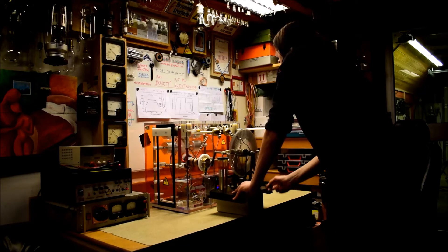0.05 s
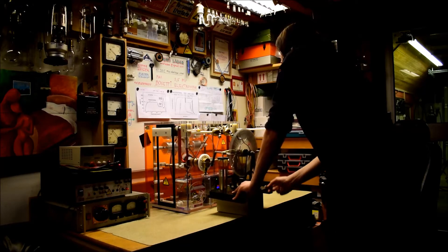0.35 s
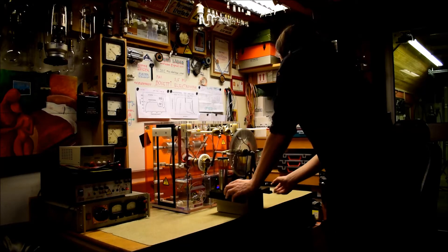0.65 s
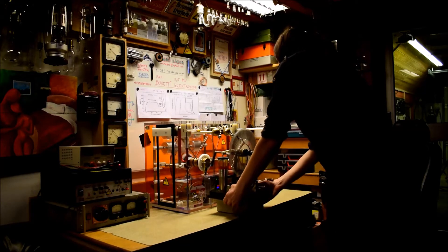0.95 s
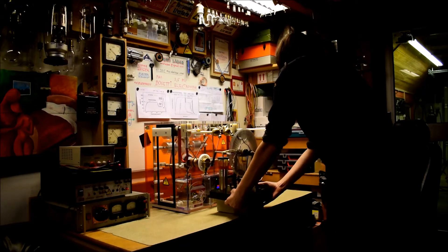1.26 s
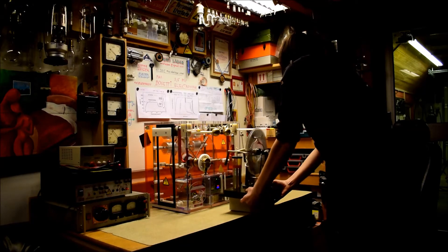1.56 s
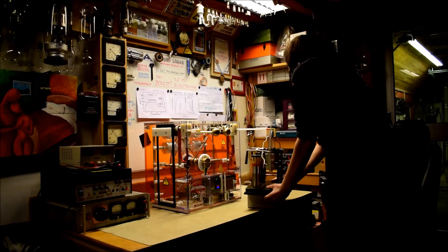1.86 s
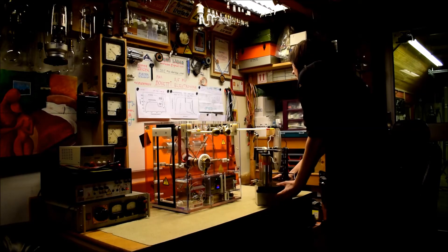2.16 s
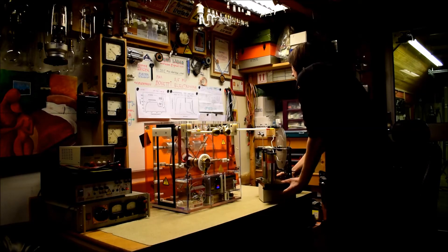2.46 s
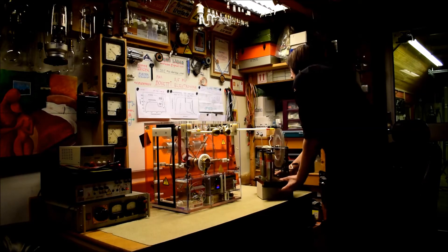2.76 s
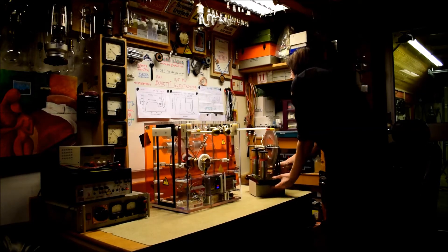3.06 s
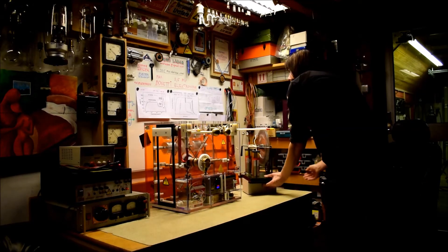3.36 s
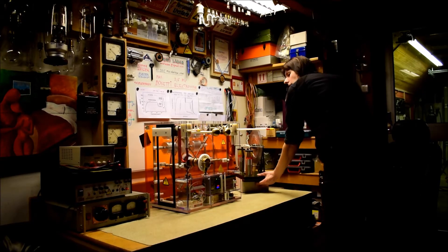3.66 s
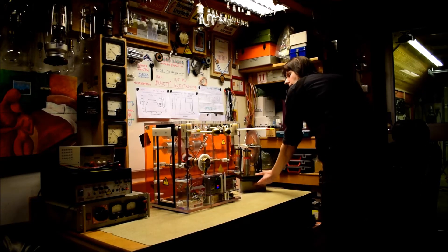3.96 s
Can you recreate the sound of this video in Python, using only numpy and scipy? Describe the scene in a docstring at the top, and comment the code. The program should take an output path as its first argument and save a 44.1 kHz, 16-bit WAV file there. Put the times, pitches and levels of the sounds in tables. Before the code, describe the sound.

Loud spark snaps crack from an electrostatic machine in a small workshop. For the first 1.3 seconds they come about three a second, with thin ticks between them. From then until about 4 seconds they repeat evenly, six or seven a second. Each snap briefly overloads the microphone and leaves a short ring in the room and machine parts. A soft whir and faint wavering hum continue underneath.

```python
"""Loud spark snaps jump the gap of an electrostatic machine in a small workshop: slowly at first,
then evenly, six or seven times a second. Each is a shock front and a bright crack that sets the
room, machine parts and shelves ringing, and overloads the microphone for a few milliseconds.
Thin ticks leak off between the slow snaps. Underneath, the running machine gives a low wash,
a wavering hum and one faint squeak."""
import sys
import numpy as np
from scipy import signal
from scipy.fft import rfft, irfft
from scipy.io import wavfile
from scipy.ndimage import uniform_filter1d

SR = 44100
rng = np.random.default_rng(int(sys.argv[2]) if len(sys.argv) > 2 else 0)


def transcribe(u):
    """Save the signal u as a 16-bit wav file named by the first command-line argument.

    u: samples, shape (n,) or (channels, n), limited to [-1, 1]; the rate is SR.
    q: integer samples, one column per channel.
    """
    v = np.clip(np.atleast_2d(u).T, -1, 1)
    q = np.round(v * 32767).astype(np.int16)
    wavfile.write(sys.argv[1], SR, q)


N = 176400
TAIL = 24000  # samples in one spark with its echoes


def amp(db):
    """Decibels to gain."""
    return 10 ** (np.asarray(db) / 20)


def unit(x):
    """Scales to rms 1."""
    return x / np.sqrt(np.mean(x ** 2) + 1e-20)


def curve(points, hz):
    """Reads a table on a log-frequency axis."""
    f, value = np.transpose(points)
    return np.interp(np.log(hz + 1), np.log(f), value)


def add(mix, at_s, sound):
    """Drops a sound into the mix at a cue time."""
    part = mix[:, max(round(at_s * SR), 0):][:, :sound.shape[-1]]
    part += sound[..., :part.shape[1]]


def tilt(x, db_per_octave):
    """Tilt EQ pivoting on 4 kHz, flat below 500 Hz."""
    hz = np.maximum(np.fft.rfftfreq(x.shape[-1], 1 / SR), 500)
    return irfft(rfft(x) * amp(db_per_octave * np.log2(hz / 4000)), x.shape[-1])


# likeness of the two microphone ports (frequency [Hz], correlation [capped at 1])
PORT_LIKENESS = [(50, 0.96), (1500, 1.15), (4000, 0.93), (8000, 0.68), (11000, 0.36), (15000, 0)]
# stereo lean (frequency [Hz], left minus right [dB])
PORT_BALANCE = [(50, -1.5), (2000, 0.5), (9000, 0.8), (10800, 0.5), (12500, -4), (14500, 2)]


def diffuse(colour, size):
    """Coloured noise from all directions as the two ports hear it, at rms 1."""
    hz = np.fft.rfftfreq(size, 1 / SR)
    mid, side = rfft(rng.standard_normal((2, size)))
    likeness = np.clip(curve(PORT_LIKENESS, hz), -1, 1)
    sign = np.array([[1], [-1]])
    stereo = mid * np.sqrt(1 + likeness) + sign * side * np.sqrt(1 - likeness)
    eq = amp(curve(colour, hz) + sign * curve(PORT_BALANCE, hz) / 2)
    return unit(irfft(stereo * eq, size))


# tone of the machine bed (frequency [Hz], relative density [dB])
WASH_COLOUR = [(30, -32), (100, -28), (200, -11), (400, -11), (550, -13.5), (800, -1), (1200, -9),
               (1800, -3), (3000, -13.5), (10000, -13), (16000, -28)]


def machine_wash(level_db=-45):
    """The steady, low noise bed of the running machine."""
    return amp(level_db) * diffuse(WASH_COLOUR, N)


# partials of the machine hum (pitch [Hz], level [dB])
HUM_TONES = [(297, -55), (392, -55), (680, -51.5)]


def machine_hum(waver_hz=5):
    """Faint tones of the running machine, each wavering in pitch."""
    out = np.zeros(N)
    for hz, db in HUM_TONES:
        drift = unit(uniform_filter1d(rng.standard_normal(N), size=3000))
        out += amp(db) * np.sin(2 * np.pi * np.cumsum(hz + waver_hz * drift) / SR)
    return out


def squeak(at_s=0.03, width_s=0.024, hz=840, level_db=-40, octave_db=-13):
    """One faint squeak: a short swell of a tone and its octave."""
    t = np.arange(N) / SR
    phase = 2 * np.pi * hz * t
    swell = np.exp(-((t - at_s) / width_s) ** 2)
    return amp(level_db) * swell * (np.sin(phase) + amp(octave_db) * np.sin(2 * phase))


# reverb time of the workshop (frequency [Hz], t60 [s])
ROOM_DECAY = [(80, 0.47), (400, 0.62), (1000, 0.24), (2000, 0.35), (4500, 0.33), (8000, 0.25), (12000, .22),
              (16000, 0.14)]


def echoes(common, colour, shared):
    """Dense room echoes, partly new because each spark takes its own path; the treble dies first."""
    field = shared * common + np.sqrt(1 - shared ** 2) * diffuse(colour, TAIL)
    hz, t, bands = signal.stft(field, SR, nperseg=256)
    decay = amp(-60 * t / curve(ROOM_DECAY, hz)[:, None])
    return signal.istft(bands * decay, SR, nperseg=256)[1][:, :TAIL]


# cues of the leakage sparks (time [s], relative level [dB])
TICK_CUES = [(0.0913, 0.5), (0.182, -7), (0.229, -12), (0.2738, -14.5), (0.3077, -7.5), (0.35, -3.5),
             (0.396, -1), (.48, -7), (0.534, -6.5), (0.5809, -1.5), (0.6272, -1), (.674, -3), (0.718, -4.5),
             (0.807, -5), (.846, -6), (0.885, -7.5), (0.9294, -2.5), (0.971, -5.5), (1.0179, -0.5),
             (1.077, -14), (1.12, -6), (1.166, -3.5), (1.2165, -1), (1.2605, -3)]
# tone of a tick's reverb (frequency [Hz], relative density [dB])
TICK_ROOM_COLOUR = [(50, -52), (200, -34), (400, -19), (600, -25.5), (1000, -15.5), (2000, -13),
                    (4000, -8.5), (6500, -5.5), (9000, -1), (11000, -0.5), (13000, -8), (16000, -11.5)]
# paths from a tick to the microphone (delay [s], relative level [dB])
TICK_TAPS = [(.0002, 1), (.0023, 1), (.0038, -8), (.0148, -12), (.017, -10)]


def ticks(needle_db=-3, needle_hz=9500, needle_s=0.00008, room_db=-15, early_db=-10, early_s=0.011):
    """Small leakage sparks: a needle of sound, its first reflections and a thin room tail."""
    out, t = np.zeros((2, N)), np.arange(TAIL) / SR
    common = diffuse(TICK_ROOM_COLOUR, TAIL)
    early_lift = 1 + amp(early_db) * np.exp(-t / early_s)
    needles = np.zeros(TAIL)
    for delay, db in TICK_TAPS:
        age = t - delay
        needles += amp(db) * np.exp(-(age / needle_s) ** 2) * np.sin(2 * np.pi * needle_hz * age)
    for at_s, db in TICK_CUES:
        room = amp(room_db) * early_lift * echoes(common, TICK_ROOM_COLOUR, shared=0.53)
        add(out, at_s, amp(db) * (room + amp(needle_db) * needles))
    return out


def blast(hz, shock_db=14, thump_s=0.0038, cutoff_ratio=4.2, spread=0.2, low_cut_hz=200):
    """The shock front of a spark, with a few milliseconds of low thump as the microphone overloads."""
    t = np.arange(TAIL) / SR
    lowpass = 1 / (1 + (np.fft.rfftfreq(TAIL, 1 / SR) / (cutoff_ratio * hz)) ** 2)
    gate = np.exp(-(t / thump_s) ** 4)
    mid, side = irfft(rfft(rng.standard_normal((2, TAIL))) * lowpass, TAIL) * gate
    thump = mid + spread * np.array([side, -side])
    thump *= np.sqrt(np.sum(gate ** 2) / np.sum(thump[0] ** 2))  # even weight from snap to snap
    phase = 2 * np.pi * hz * t
    shock = amp(shock_db) * (phase - 1) * np.exp(-phase)
    return signal.lfilter(*signal.butter(1, low_cut_hz, "high", fs=SR), shock + thump)


# modes of machine parts and shelves (pitch [Hz], relative level [dB], t60 [s])
PART_MODES = [(409, -42, .5), (700, -38, 0.63), (1056, -35, 0.72), (1260, -27, 0.12), (1510, -37, 0.28),
              (1660, -31.5, 0.32), (1832, -21, 0.28), (2360, -29, 0.36), (3160, -34, .3), (4150, -22, 0.34),
              (4240, -47, 0.3)]


def ringing_parts(t):
    """Machine parts and shelves ring on after a snap as decaying sines."""
    return sum(amp(db - 60 * t / t60) * np.sin(2 * np.pi * (hz * t + rng.random()))
               for hz, db, t60 in PART_MODES)


# cues of the full discharges (time [s], room and ring level [dB], relative blast level [dB],
# blast pitch [Hz], room brightness [dB/octave])
SNAP_CUES = [(0.1321, -2, 19, 234, 0), (0.4261, -2, 12.5, 245, 0), (0.7633, -3.5, 7.5, 272, -0.5),
             (1.0716, -5.5, 8.5, 390, 0), (1.335, -1, 5.5, 580, 0), (1.4803, -3, 5, 470, 0),
             (1.6211, -3.5, 11, 223, 0), (1.773, -2.5, -2.5, 700, -0.5), (1.93, -2.5, 12.5, 413, 0),
             (2.072, -2.5, -9, 800, 0.5), (2.2364, -1.5, 12.5, 430, 0.5), (2.3893, -2, 7, 380, 0.5),
             (2.5504, -1.5, -18, 800, 0.5), (2.7043, -2, 1, 900, 0), (2.847, -2.5, -2, 900, 0.5),
             (3.0071, -3, -1, 880, 0), (3.1645, -2, 7.5, 795, 0.5), (3.329, -2.5, -4, 555, -0.5),
             (3.4872, -1.5, 16.5, 322, 0), (3.6397, -2, 5, 750, 0.5), (3.7824, -2, -0.5, 650, 0.5),
             (3.9411, -2.5, -3, 650, 0.5)]
# tone of a snap's crack and reverb (frequency [Hz], relative density [dB])
SNAP_ROOM_COLOUR = [(40, -52), (150, -34.5), (270, -31), (390, -16.5), (520, -19.5), (750, -10.5),
                    (1050, -2.5), (1500, 1.5), (2200, -1), (2800, -1.5), (4200, 0.5), (6500, 1), (9500, 3),
                    (11000, 0.5), (13000, -7), (16000, -5.5)]


def snaps(crack_db=17.5, crack_s=0.0026, blast_trim_db=-4.5):
    """Full discharges across the gap: crack and blast, then the room and the ringing parts."""
    out, t = np.zeros((2, N)), np.arange(TAIL) / SR
    common = diffuse(SNAP_ROOM_COLOUR, TAIL)
    crack = 1 + amp(crack_db) * np.exp(-(t / crack_s) ** 2)  # the first, strongest arrivals
    fade_out = np.minimum(4 * (1 - t / t[-1]), 1)
    for at_s, db, blast_db, blast_hz, brightness in SNAP_CUES:
        room = tilt(echoes(common, SNAP_ROOM_COLOUR, shared=0.44), brightness) * fade_out
        body = amp(db) * (room * crack + ringing_parts(t))
        punch = amp(blast_trim_db + blast_db) * blast(blast_hz)
        add(out, at_s, body + punch)
    return out


def scene():
    """Snaps and ticks over the running machine."""
    return snaps() + ticks() + machine_wash() + squeak() + machine_hum()


def record(dry, knee=6, high_cut_hz=15850):
    """The microphone soft-clips on every snap; a steep high cut follows."""
    clipped = dry / (1 + abs(dry) ** knee) ** (1 / knee)
    high_cut = signal.firwin(255, high_cut_hz, window=("kaiser", 7), fs=SR)
    return signal.oaconvolve(clipped, high_cut[None], "same")


dry = scene()
out = record(dry)
transcribe(out)
```